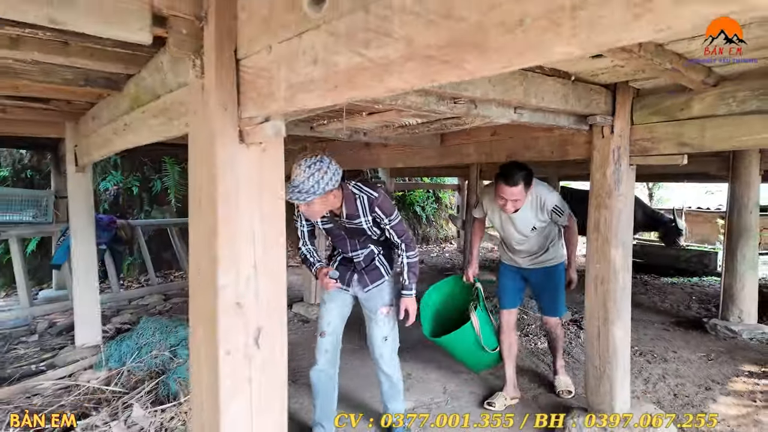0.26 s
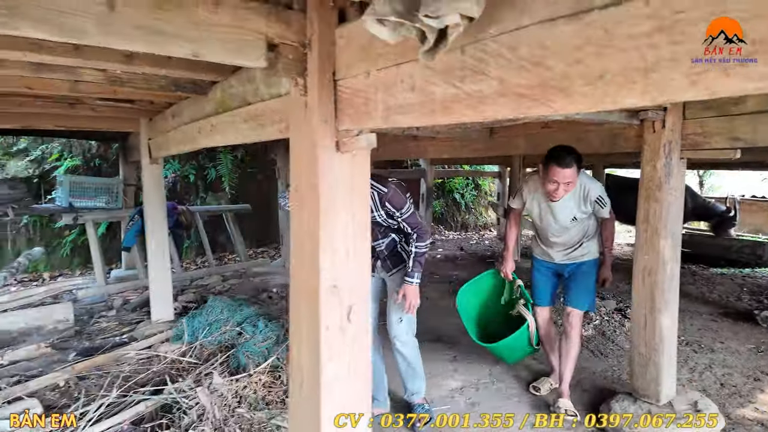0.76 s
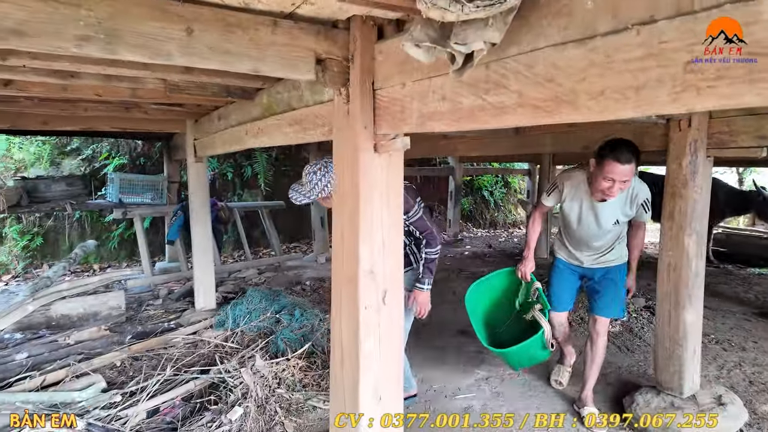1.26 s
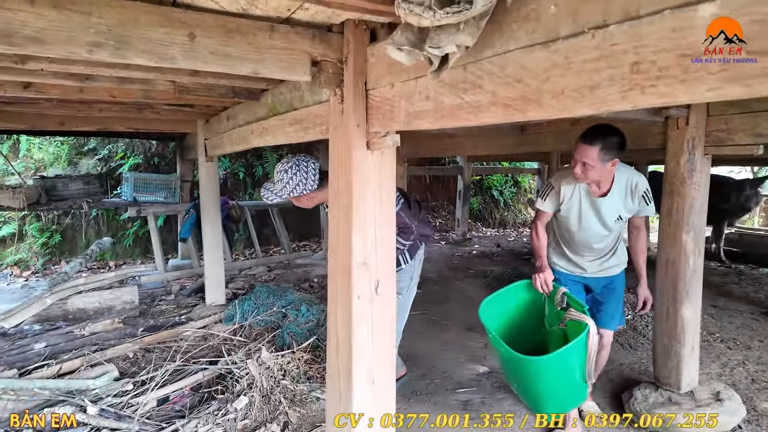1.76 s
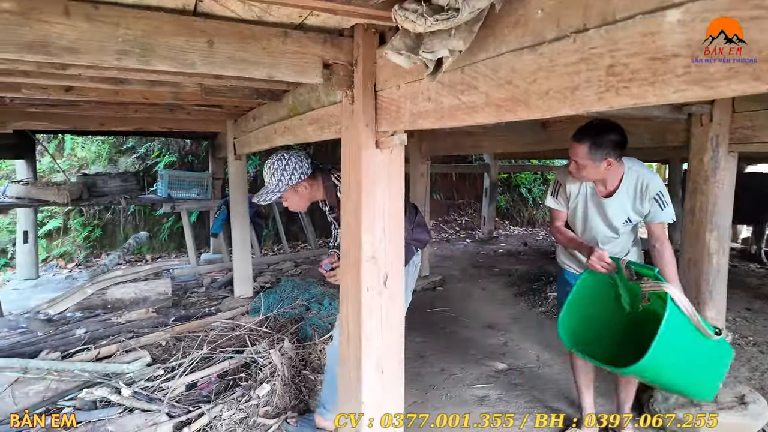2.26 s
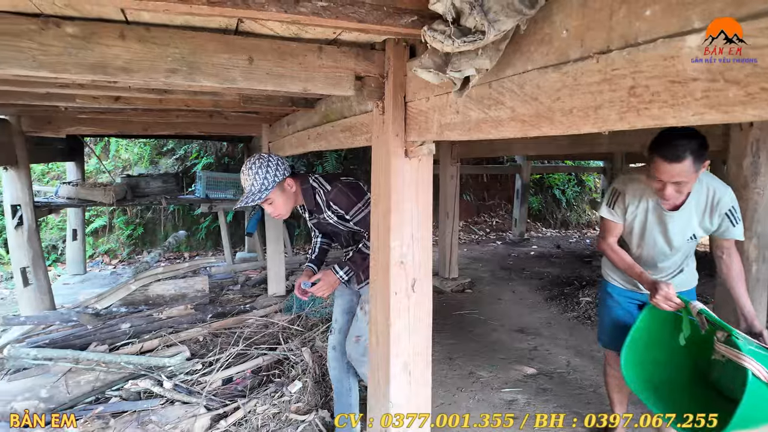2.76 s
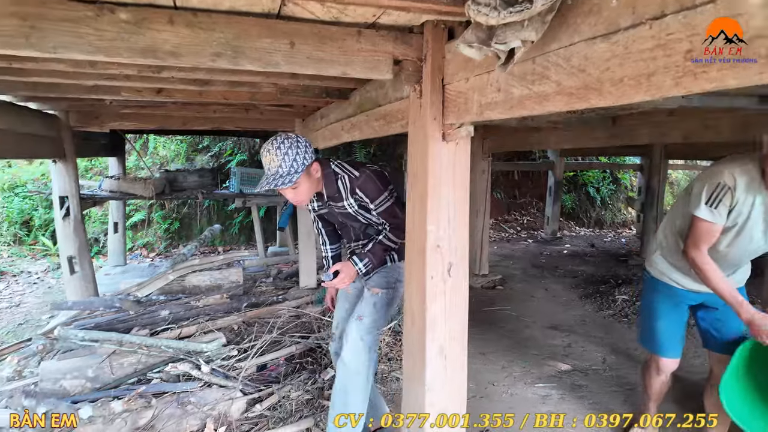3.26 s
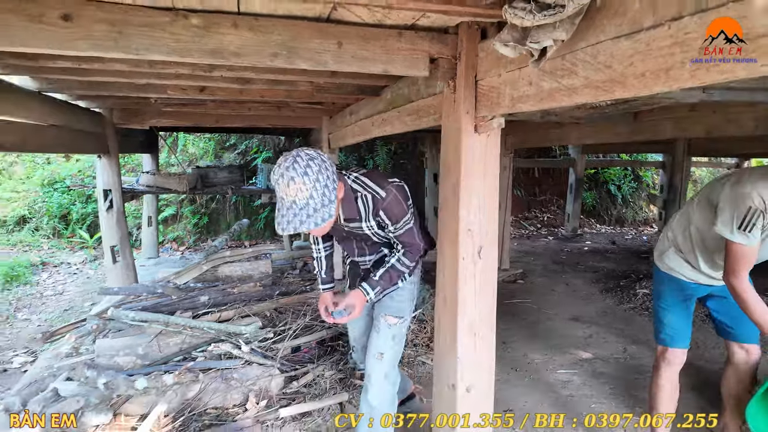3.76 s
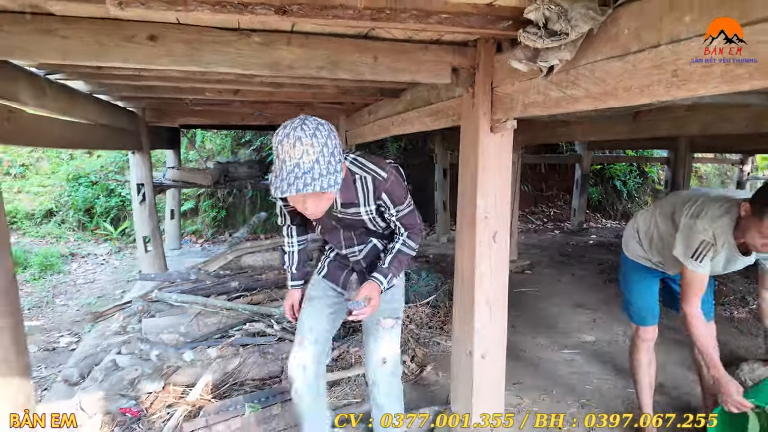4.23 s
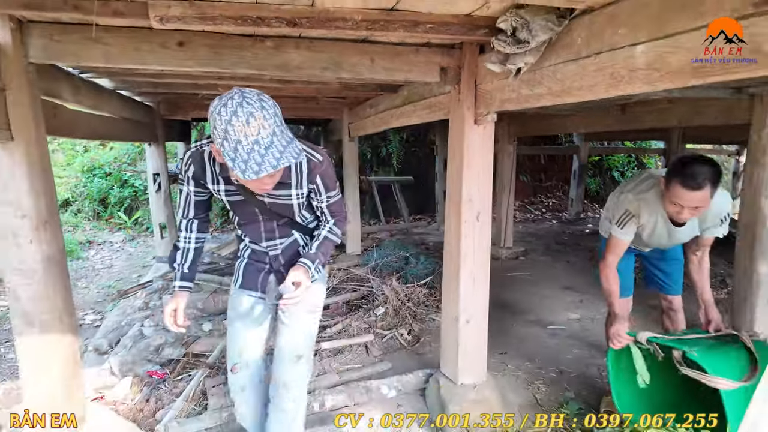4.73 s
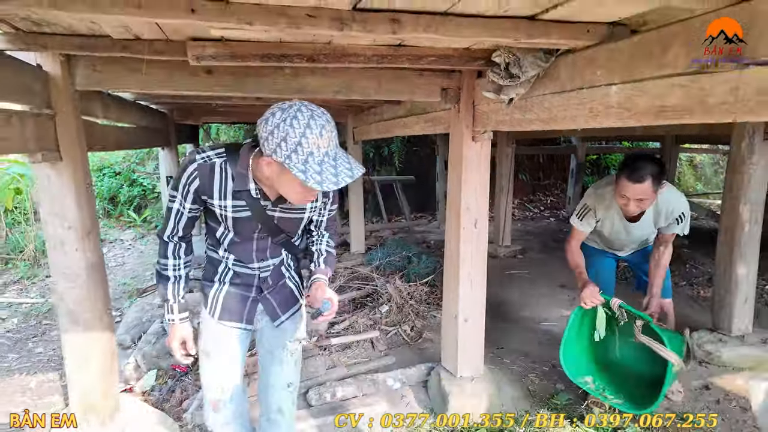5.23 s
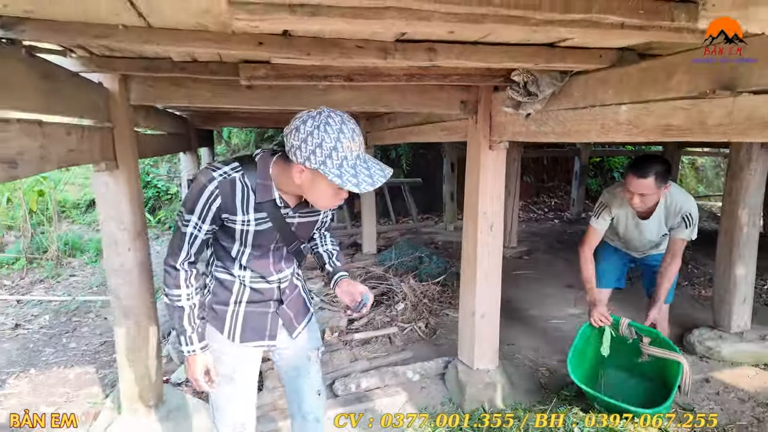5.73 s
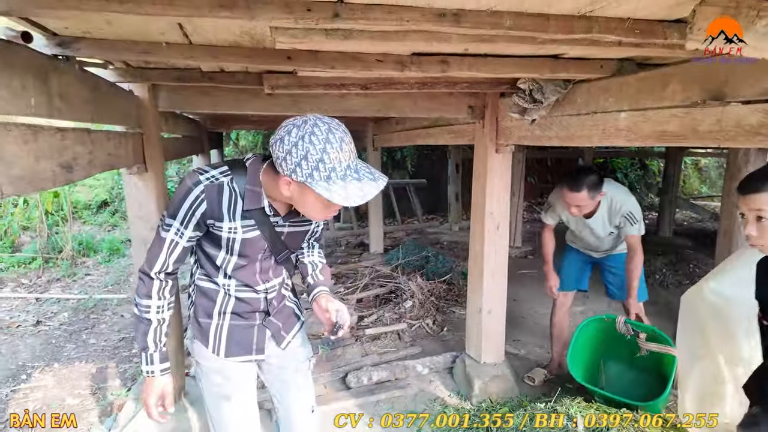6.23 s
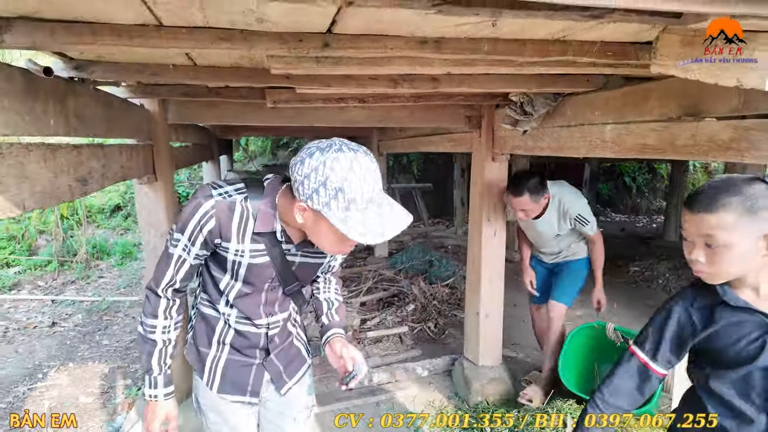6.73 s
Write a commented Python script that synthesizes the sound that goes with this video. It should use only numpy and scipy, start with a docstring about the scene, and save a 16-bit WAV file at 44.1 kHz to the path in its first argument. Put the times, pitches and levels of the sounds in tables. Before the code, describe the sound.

Throughout, two crickets trill near 3.8 and 3.9 kHz, their bright overtones pulsing about three times a second, over a blurred far insect chorus and soft background noise. At 0-0.5 s a distant bird gives thin rising whistles while sandals lightly scuff dirt. A plastic tub knocks hollowly around 1.05 s, with a grit crack at 1.3. Scuffs and stone snaps return at 2.2-2.6, with a knock at 2.5 and the loudest hollow clonk at 2.9. A calmer gap follows, with a barely audible grunt at 3.5. At 4.14-4.6 a close pig bursts out in rapid rough throbs, including a short snort, sinking into a nasal hum. Scuffing continues around 5.2; a second, softer grunt run spans 5.45-6.0 with faint nostril squeaks. Light bumps come at 6.3, bird whistles from 6.55, a stone crack at 6.75. The shelter adds a short, weak echo.

```python
"""A pig grunts close by under a wooden stilt house while two crickets drone over a far insect chorus.
Grunts are rows of voiced throbs through snout and mouth, ending in a closed-mouth hum; one has a noise snort.
The crickets are sums of tones whose overtones brighten about three times a second and fade in the leaves.
Filtered noise scuffs the dirt floor and cracks stones, and a carried plastic tub rings with hollow knocks.
A far bird glides upward in thin whistles, over background noise that rises around the loud grunts."""
import sys
import numpy as np
from scipy import signal
from scipy.fft import rfft, irfft
from scipy.io import wavfile

SR = 44100
rng = np.random.default_rng(int(sys.argv[2]) if len(sys.argv) > 2 else 0)


def materialize(psi):
    """Save the field psi as 16-bit PCM at rate SR to the path in sys.argv[1].

    A 1-D psi becomes a single channel; in a 2-D psi each row is a channel.
    """
    bounded = np.clip(np.atleast_2d(psi).T, -1, 1)
    quanta = np.round(bounded * 32767).astype(np.int16)
    wavfile.write(sys.argv[1], SR, quanta)


N = 308259
TIME = np.arange(N) / SR

# noise colour of breath rasp and snort, also of the tub's tick: (frequency [Hz], level [dB])
RASP_COLOUR = [(900, -29), (1600, 2), (2000, 4), (2900, 0.5), (3600, -14), (4600, -18.5), (6400, -14),
               (7500, -33.5), (15000, -48)]
# noise colour of grit and cracking stones: (frequency [Hz], relative density [dB per Hz])
GRIT_COLOUR = [(60, -19), (200, 0.5), (600, 1.5), (1300, 4), (1900, 2.5), (2700, 6), (4300, -0.5),
               (6500, 1), (7600, -10.5), (10000, -18), (15500, -29)]


def gain_of(db):
    """Amplitude factor of a level in dB."""
    return 10 ** (np.asarray(db) / 20)


def evened(x):
    """Scales a sound to unit RMS."""
    return x / np.sqrt(np.mean(x ** 2) + 1e-20)


def add(mix, s, sound):
    """Lays a sound into the mix from time s [s]."""
    part = mix[max(round(s * SR), 0):][:len(sound)]
    part += sound[:len(part)]


def follow(points):
    """Draws a curve through (time [s], value) points over the whole scene."""
    return np.interp(TIME, *np.transpose(points))


def colour(x, points):
    """Filters x by a spectrum of (frequency [Hz], level [dB]) points."""
    hz, db = np.transpose(points)
    bins = np.fft.rfftfreq(len(x), 1 / SR)
    curve_db = np.interp(np.log(bins + 1), np.log(hz), db)
    return irfft(rfft(x) * gain_of(curve_db), len(x))


def resonate(x, hz, width):
    """One resonance: a damped two-pole ring whose width [Hz] sets how fast it dies."""
    r = np.exp(-np.pi * width / SR)
    return signal.lfilter([1, 0, -1], [1, -2 * r * np.cos(2 * np.pi * hz / SR), r * r], x)


def ring(x, modes):
    """A cavity: its resonances side by side."""
    return sum(gain_of(db) * width * resonate(x, hz, width) for hz, width, db in modes)


def drift(count, rate):
    """Random wander: straight lines between unit-size random values, rate [1/s] of them."""
    knots = rng.standard_normal(4096)
    return np.interp(np.arange(count) / SR * rate, np.arange(len(knots)), knots)


def arch(u, bluntness):
    """Swells and fades as u runs from 0 to 1."""
    return np.maximum(np.sin(np.pi * np.clip(u, 0, 1)), 0) ** bluntness


def swell(x, shape, db, spectrum):
    """Gives x an envelope, a colour and a level at its height."""
    sound = colour(x * shape, spectrum)
    return gain_of(db) * sound * np.linalg.norm(shape) / np.linalg.norm(sound)


def throb(length, db, opening, start_hz, end_hz, rough, jitter=.15, wander=0.031, shimmer_db=5.0,
          lag=.65, release=0.95, shunt=0.45):
    """Uneven fold pulses and puffs of air ring the snout, and the mouth while it is open."""
    # cavity resonances: (frequency [Hz], width [Hz], level [dB])
    snout_modes = [(171.3, 29, -2.5), (224.3, 49, -2), (305, 90, -3)]
    mouth_modes = [(473, 120, 10), (598, 110, 0), (757, 280, -2.5), (900, 110, 4.5), (1080, 68, -5),
                   (1282, 170, 7), (1600, 98, 3)]
    # overall colour of each cavity's sound: (frequency [Hz], level [dB])
    snout_wall = [(40, -28), (90, -2.5), (150, 0.5), (230, 3), (320, -4), (390, -2), (480, -22.5),
                  (800, -64)]
    mouth_wall = [(250, -43), (420, 6), (700, 0), (1400, -9), (2000, -18.5), (3500, -42)]
    shut_db, open_db = -23, 0.5  # mouth against snout, at opening 0 and 1
    rasp_db, smooth_rasp_db = -2.5, -28.5  # rasp against mouth when fully rough, and the drop to smooth
    smooth_hz, rough_hz = 580, 1300  # main mouth resonance rises with strain, roughness 0 to 1
    attack_s = 0.0022
    mouth_open_s, strain_hold_s = 0.023, 0.046  # the mouth shuts this soon, later when rough

    count = 16384
    t = (np.arange(count) - 2048) / SR  # the folds run before the throb is heard
    u, rough, opening = np.clip(t / length, 0, 1), np.clip(rough, 0, 1), np.clip(opening, 0, 1)
    glide_hz = start_hz + (end_hz - start_hz) * u
    hz = glide_hz * (1 + (wander + jitter * rough) * drift(count, 153.8))
    turns = np.cumsum(hz) / SR
    turns -= np.interp(.4 * length, t, turns)

    # thick folds close slowly: each higher harmonic comes later in the cycle
    folds = evened(sum(np.cos(2 * np.pi * k * turns - lag * k * k) for k in np.arange(1, 25)))
    folds *= gain_of(shimmer_db * drift(count, 65.2))
    # breath noise bursts at the start of each cycle
    puffs = evened((.55 + np.exp(-(turns % 1) / .3)) * rng.standard_normal(count))
    drive = (1 - rough) * folds + rough * puffs

    whole = -np.expm1(-np.maximum(t, 0) / attack_s) * np.exp(-(t / (release * length)) ** 6)
    opened = whole * np.exp(-(t / (mouth_open_s + strain_hold_s * rough)) ** 4)
    # while the mouth is open it draws air away from the snout
    snout_shape = whole - np.clip(shunt * opening * (1 - rough), 0, 1) * opened
    snout = swell(ring(drive, snout_modes), snout_shape, db, snout_wall)

    mouth_db = db + shut_db + (open_db - shut_db) * opening
    mouth_hz = smooth_hz + (rough_hz - smooth_hz) * rough
    strained = resonate(drive + 2.9 * rough * puffs, mouth_hz, 400)
    mouth = swell(ring(strained, mouth_modes), opened, mouth_db, mouth_wall)
    rasp = swell(puffs, opened, mouth_db + rasp_db + smooth_rasp_db * (1 - rough), RASP_COLOUR)
    return (snout + mouth + rasp)[t >= 0]


def pig(snort_late=3.2):
    """Throbs of the voice in a row, a snort that builds and breaks off, and thin squeaks of air."""
    # voice: (time [s], length [s], snout level [dB], mouth opening [0-1],
    #         start pitch [Hz], end pitch [Hz], roughness [0-1])
    throbs = [ (0.079, .125, -52, 0.56, 104.5, 102.7, 0.63), (3.532, 0.035, -51, 0.65, 124, 109, 0.7),
              (4.139, 0.053, -12.5, 0.71, 262.3, 243.5, 0.64), (4.197, .037, -9.5, 0.45, 293.5, 238, 0.62),
              (4.242, .019, -11.5, 0.73, 263.6, 241, 0.49), (4.264, .04, -20.5, 0.77, 95, 84, 0.68),
              (4.305, .035, -27.5, 0.38, 124, 116, 0.52), (4.332, 0.049, -24, 0.39, 250.5, 240, 0.07),
              (4.382, .03, -31.5, 0.2, 237, 234, 0.06), (4.413, 0.028, -32, 0.28, 91.6, 87, 0.56),
              (4.438, 0.051, -30, 0.34, 105, 108.5, 0.4), (4.476, 0.07, -25, 0.12, 246, 229, .33),
              (4.544, 0.077, -32.5, 0.38, 242, 234, 0.32), (4.749, .11, -51, 0, 105, 100.4, 0.69),
              (4.905, 0.049, -49, 0.4, 231, 220, 0.42), (5.45, 0.059, -22, 0.83, 257, 228, 0.2),
              (5.593, 0.056, -29, 0.37, 246, 236, 0.36), (5.65, 0.041, -19.5, 0.44, 123.5, 115.4, 0.04),
              (5.683, 0.035, -36, 0.54, 114, 106, 0.26), (5.723, 0.045, -35, 0.46, 122.5, 114, 0),
              (5.77, 0.071, -39.5, .25, 239, 228, 0.48), (5.877, .054, -33.5, 0.23, 181.5, 145, 0.28),
              (5.925, .06, -47.5, 0.55, 155, 143, 0.48), (6.559, 0.12, -57, 0.44, 102, 98, 0.84)]
    # a blast of air through the nose: (time [s], length [s], level [dB])
    snorts = [(4.258, .03, -24.5)]
    # air squeaking in the nostrils: (time [s], length [s], frequency [Hz], level [dB])
    squeaks = [(5.62, 0.013, 3000, -45), (5.664, 0.056, 2800, -48)]

    out = np.zeros(N)
    for s, *row in throbs:
        add(out, s, throb(*row))
    for s, length, db in snorts:
        u = np.arange(4096) / (length * SR)
        breath = rng.standard_normal(len(u))
        add(out, s, swell(breath, arch(u ** snort_late, 0.28), db, RASP_COLOUR))
    for s, length, hz, db in squeaks:
        u = np.arange(0, 1, 1 / (length * SR))
        breath = rng.standard_normal(len(u))
        whistle = evened(resonate(resonate(breath, hz, 330), hz, 330))
        add(out, s, gain_of(db) * arch(u, 0.56) * whistle)
    return out


def cricket(tone, level, surge, lines, line_db, stroke_hz, waver_hz, strain, overtones_db=-4.5,
            surge_db=0.5, flutter_db=2.0, echo=0.9, fades_per_s=7):
    """Wing strokes put side lines round a tone and its overtones; pushed higher, it grows unsteady."""
    # overtones of either cricket, before overtones_db: (time [s], level [dB])
    overtone_level = [(0.0, -54), (0.68, -53), (0.7, -55.5), (2.02, -59.5), (2.08, -51.5), (2.24, -58),
                      (3.19, -52), (3.39, -60.5), (3.58, -50), (3.72, -55.5), (5.55, -52.5), (6.99, -55.5)]

    hz = follow(tone)
    unsteady_hz = waver_hz + strain * np.maximum(hz - np.median(hz), 0)
    wing = np.cumsum(hz + unsteady_hz * drift(N, 130)) / SR
    stroke = np.cumsum(stroke_hz + .5 * drift(N, 25)) / SR

    tone_db = follow(level) + 0.51 * drift(N, 30)
    # each surge lifts the overtones, the higher ones more
    first_peak_s, period_s = surge
    bright_db = surge_db * np.cos(2 * np.pi * (TIME - first_peak_s) / period_s)
    upper_db = overtones_db + follow(overtone_level) + 2.8 * drift(N, 26)

    out = np.zeros(N)
    for (overtone, side), db in zip(lines, line_db):
        base_db = tone_db if overtone == 1 else upper_db + (overtone - 1) * bright_db
        phase = 2 * np.pi * (overtone * wing + side * stroke + rng.random())
        # a second path through the leaves shifts its delay, so each line fades in and out on its own
        delay = 2 * np.pi * (rng.random() + .5 * drift(N, fades_per_s))
        both_paths = np.cos(phase) + echo * np.cos(phase + delay)
        out += gain_of(base_db + db + flutter_db * drift(N, 14)) * both_paths
    return out * np.sqrt(2 / (1 + echo ** 2))


def high_cricket():
    """The higher cricket: its wing tone stays steadier until it is pushed up."""
    # wing tone: (time [s], frequency [Hz])
    tone = [(0, 3944), (.6, 3946), (3, 3949), (3.6, 3953), (4.5, 3953), (5, 3948), (6.62, 3949),
            (6.75, 3985), (6.99, 3997)]
    # wing tone before the line levels: (time [s], level [dB])
    level = [(0.0, -51.5), (0.53, -55), (0.56, -46), (0.74, -62), (1.13, -49.5), (1.28, -68), (1.34, -49),
             (1.61, -57.5), (2.57, -53), (3.15, -58), (3.58, -47.5), (3.87, -55.5), (4.9, -48.5),
             (5.02, -54.5), (5.26, -49), (5.43, -55.5), (6.89, -56.5), (6.99, -51)]
    # brightness surges: (first peak [s], period [s])
    surge = (.28, .358)
    # spectral lines: (overtone [1 = wing tone], offset [stroke rates])
    lines = [(1, -2), (1, 0), (1, 2), (1, 3), (1, 4), (2, -2), (2, 0), (2, 1), (2, 2), (2, 3), (2, 4),
             (2, 5), (2, 6), (3, 0), (4, -2)]
    # relative level of each line [dB]
    line_db = [-15, 0.5, -8, -18.5, -22.5, -9, 1, -26.5, -6.5, -24.5, -14, -37, -19.5, -29, -37]
    return cricket(tone, level, surge, lines, line_db, stroke_hz=143, waver_hz=2, strain=.6)


def low_cricket():
    """The lower cricket: its wing tone wavers more widely from the start."""
    # wing tone: (time [s], frequency [Hz])
    tone = [(0, 3778), (.6, 3777), (1, 3785), (2.2, 3789), (2.8, 3797), (3.1, 3822), (3.6, 3842), (4, 3832),
            (4.6, 3774), (6.99, 3773)]
    # wing tone before the line levels: (time [s], level [dB])
    level = [(0.0, -51), (0.88, -55.5), (0.89, -53), (2.2, -56.5), (2.26, -48), (3.02, -61.5), (3.58, -51),
             (3.85, -52.5), (4.36, -49.5), (4.88, -54), (5.06, -58), (5.18, -43.5), (5.53, -54),
             (5.76, -44.5), (5.82, -62), (5.92, -48), (5.99, -52.5), (6.99, -53)]
    # brightness surges: (first peak [s], period [s])
    surge = (.17, .352)
    # spectral lines: (overtone [1 = wing tone], offset [stroke rates])
    lines = [(1, -2), (1, 0), (1, 2), (2, -2), (2, 0), (2, 2), (2, 4), (3, 0), (4, -2), (4, 0)]
    # relative level of each line [dB]
    line_db = [-17, -2.5, -13, -9, -4, -11, -20, -27.5, -41, -26]
    return cricket(tone, level, surge, lines, line_db, stroke_hz=143.5, waver_hz=4, strain=.4)


def tub(rattle_s=.01, tick_db=-30, tick_s=.0006):
    """A knock ticks, rings the soft plastic wall for a few cycles and leaves a short rattle."""
    # hollow knocks: (time [s], level [dB], ring [Hz], swell time [s], rattle against wall [dB])
    knocks = [(.744, -43.5, 970, 0.0012, -2), (1.0515, -26.5, 900, 0.0015, -12.5),
              (1.0515, -29.5, 1600, 0.0017, -8), (1.079, -43.5, 1050, 0.0017, 6),
              (1.097, -29.5, 1130, 0.00053, -3), (2.171, -41, 845, 0.00064, 9),
              (2.4874, -26, 1020, 0.00052, -9.5), (2.590, -34, 1050, 0.00091, 0),
              (2.675, -37.5, 1080, 0.00054, -14), (2.8808, -7.5, 1117, .00096, -16),
              (2.967, -48, 1600, 0.00083, -8), (4.967, -40.5, 1450, 0.0011, -7)]

    out, t = np.zeros(N), np.arange(4096) / SR
    for s, db, hz, swell_s, rattle_db in knocks:
        wall = (t / swell_s * np.exp(1 - t / swell_s)) ** 2 * np.sin(2 * np.pi * hz * t)
        # the wall's ring is scattered by a decaying burst of noise
        scatter = rng.standard_normal(len(t)) * np.exp(-t / rattle_s) * (t > .003)
        rattle = signal.fftconvolve(wall, scatter)[:len(t)]
        rattle *= gain_of(rattle_db) * np.linalg.norm(wall) / np.linalg.norm(rattle)
        tick_shape = t / tick_s * np.exp(1 - t / tick_s)
        tick = swell(rng.standard_normal(len(t)), tick_shape, tick_db, RASP_COLOUR)
        add(out, s, gain_of(db) * (tick + wall + rattle) * (t < .06))
    return signal.sosfilt(signal.butter(2, 180, "high", fs=SR, output="sos"), out)


def feet(grain_db=3):
    """Grit slides in clumps under a sole; the weight lands with a dull thud."""
    # sandals and cloth scraping: (peak time [s], length [s], level [dB], tilt [dB per octave])
    scuffs = [(0.176, 0.049, -50, 2.5), (0.523, 0.047, -55, 0), (0.661, 0.042, -54, 7),
              (0.807, 0.11, -53, -2), (1.336, 0.029, -56, -0.5), (1.764, 0.21, -57.5, -1.5),
              (2.245, 0.077, -39, -0.6), (2.316, 0.031, -43.5, 2), (2.431, 0.05, -49, 0.5),
              (2.474, 0.01, -42, -4), (2.602, 0.01, -38.5, 5.5), (2.8, 0.0059, -43.5, 0),
              (3.663, 0.11, -53.5, 0), (4.485, 0.29, -48, 6), (4.831, 0.035, -45.5, 0.5),
              (5.175, 0.068, -44, -2), (5.232, 0.16, -40.5, 1), (5.774, 0.03, -43, 7),
              (5.871, 0.074, -40.5, -7), (6.303, 0.18, -58.5, 8.5)]
    # soft footfalls and bumps: (peak time [s], length [s], level [dB], frequency [Hz])
    thuds = [(0.832, .25, -65, 39.4), (2.25, 0.15, -64, 170), (2.598, 0.022, -44.5, 267),
             (2.787, .012, -53, 251), (3.641, .21, -64, 146), (6.279, 0.0059, -42, 201),
             (6.366, .04, -53.5, 306)]

    out, count = np.zeros(N), 32768
    t = (np.arange(count) - count // 2) / SR  # zero at the peak
    for s, length, db, tilt in scuffs:
        spectrum = [(hz, level + tilt * np.log2(hz / 3000)) for hz, level in GRIT_COLOUR]
        hiss = colour(rng.standard_normal(count), spectrum)
        grit = evened(hiss * gain_of(grain_db * drift(count, 400)))
        # rises faster than it falls
        shape = np.exp(-(2 * t / length) ** 2 * np.where(t < 0, 1.8, .8))
        add(out, s + t[0], (gain_of(db) * grit * shape)[s + t >= 0])
    for s, length, db, hz in thuds:
        push = evened(resonate(resonate(rng.standard_normal(count), hz, 2.0 * hz), hz, 0.6 * hz))
        add(out, s + t[0], gain_of(db) * push * np.exp(-(2 * t / length) ** 2))
    return out


def stones(dull_db=-7):
    """Sudden snaps with the colour of the grit, dulled in the top by the sole above them."""
    # small stones cracking under a sole: (time [s], level at the start before dulling [dB], decay time [s])
    cracks = [(1.3225, -37.5, .005), (2.2265, -34, .005), (2.5985, -29, .004), (2.7715, -45, .002),
              (6.7505, -36.5, .003)]

    out, t = np.zeros(N), np.arange(4096) / SR
    for s, db, decay in cracks:
        snap = evened(colour(rng.standard_normal(len(t)), GRIT_COLOUR))
        add(out, s, gain_of(db) * np.exp(-t / decay) * snap)
    return colour(out, [(6500, 0), (14000, dull_db)])


def underfloor(x, t60=0.35, wet_db=-23):
    """Posts and floorboards overhead return a short, weak echo: a decaying noise tail."""
    t = np.arange(SR // 2) / SR
    tail = rng.standard_normal(len(t)) * gain_of(-60 * t / t60) * (t > .006)
    return x + gain_of(wet_db) * signal.fftconvolve(x, tail / np.linalg.norm(tail))[:N]


def bird():
    """A far bird: thin upward sine glides, their pitch blurred by the trees."""
    # rising whistles: (time [s], length [s], start [Hz], end [Hz], level [dB])
    whistles = [(.08, .09, 4600, 5300, -69), (0.257, .08, 4550, 5140, -66), (0.43, 0.11, 4600, 5160, -66),
                (6.55, 0.16, 4500, 5300, -65), (6.815, 0.18, 4600, 5440, -66)]

    out = np.zeros(N)
    for s, length, start_hz, end_hz, db in whistles:
        u = np.arange(0, 1, 1 / (length * SR))
        hz = start_hz + (end_hz - start_hz) * u + 110 * drift(len(u), 500)
        glide = np.sin(2 * np.pi * np.cumsum(hz) / SR)
        add(out, s, gain_of(db) * np.sqrt(2) * arch(u, .7) * glide)
    return out


def background(chorus_db=-56, noise_db=6):
    """Far insects blur into two shimmering noise bands over background noise of changing level."""
    # noise colours: (frequency [Hz], relative density [dB per Hz])
    chorus_colour = [(2200, -23.5), (2900, -14.5), (3400, -10), (3850, 1), (4150, -13), (4400, -12),
                     (5500, -25), (7000, -26.5), (7400, -20.5), (7900, -6.5), (8400, -23.5), (9300, -37.5),
                     (12000, -47.5), (13000, -49)]
    noise_colour = [(20, -24), (60, -1), (200, 0), (400, 0), (1000, -4.5), (2000, -4.5), (3000, -4),
                    (6300, -10.5), (9000, -19), (15500, -29)]
    # background noise, rising around the loud grunts, before noise_db is added: (time [s], level [dB])
    noise_level = [(0.0, -65), (0.25, -71), (2.2, -73), (2.37, -63), (2.84, -71), (3.13, -76),
                   (4.15, -62.5), (4.36, -56.5), (4.63, -61), (4.96, -65), (5.72, -56.5), (6.01, -61),
                   (6.6, -66), (6.99, -66.5)]

    shimmer_db = drift(N, 5) + 1.6 * drift(N, 250)
    chorus = evened(colour(rng.standard_normal(N), chorus_colour)) * gain_of(chorus_db + shimmer_db)
    noise = evened(colour(rng.standard_normal(N), noise_colour))
    return chorus + noise * gain_of(noise_db + follow(noise_level) + 2.4 * drift(N, 30))


def scene():
    """Pig, feet and stones echo under the floorboards; the other sounds are added without that echo."""
    crickets = high_cricket() + low_cricket()
    under_house = underfloor(pig() + feet() + stones())
    return (under_house + tub() + crickets + bird() + background())[None]


def record(dry, edge_hz=15720):
    """The band limit of the recorder: a steep low-pass."""
    lowpass = signal.firwin(511, edge_hz, window=("kaiser", 9), fs=SR)
    return signal.oaconvolve(dry, lowpass[None], "same")


dry = scene()
out = record(dry)
materialize(out)
```